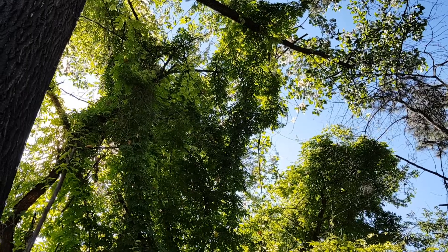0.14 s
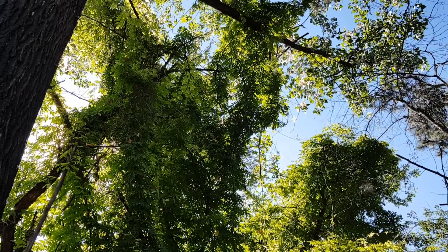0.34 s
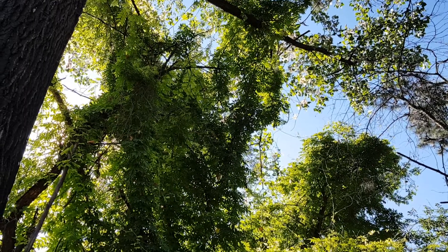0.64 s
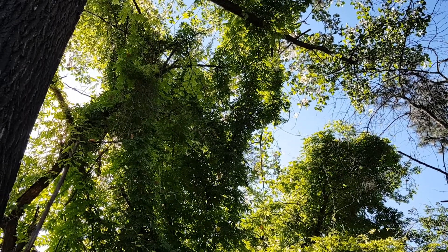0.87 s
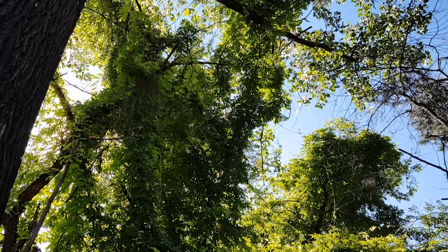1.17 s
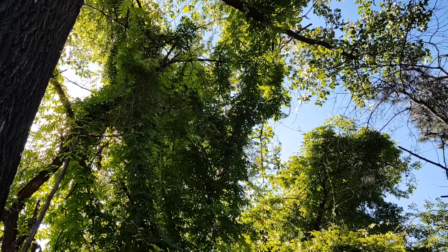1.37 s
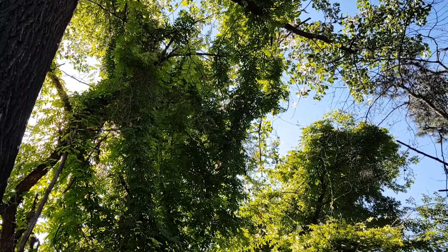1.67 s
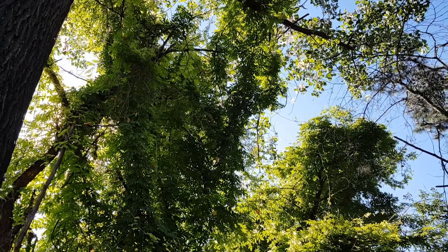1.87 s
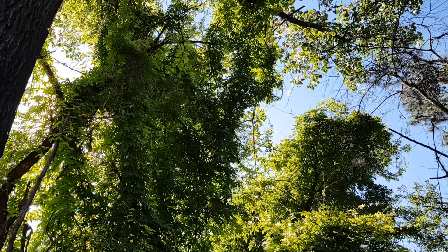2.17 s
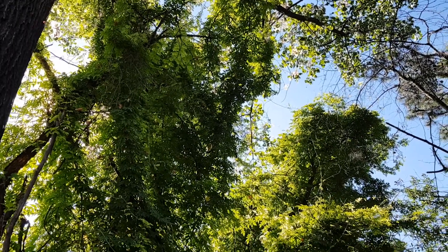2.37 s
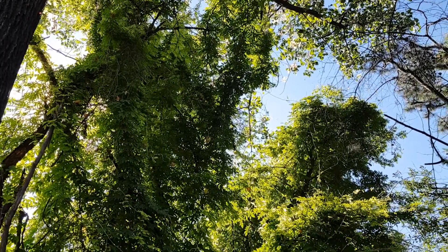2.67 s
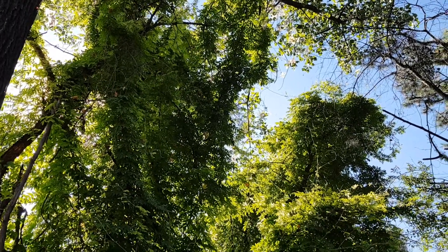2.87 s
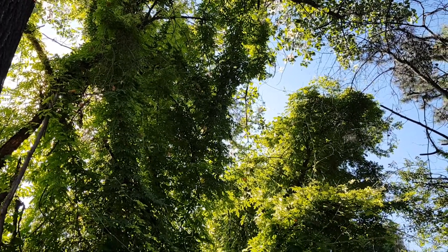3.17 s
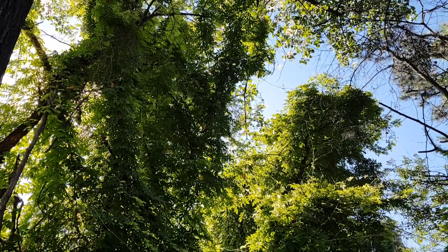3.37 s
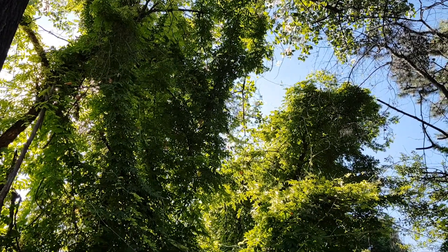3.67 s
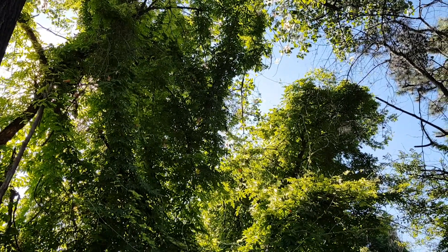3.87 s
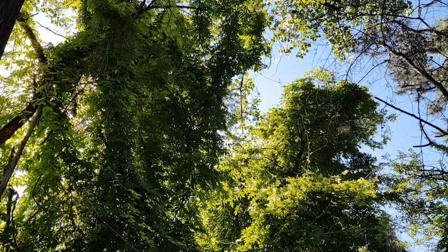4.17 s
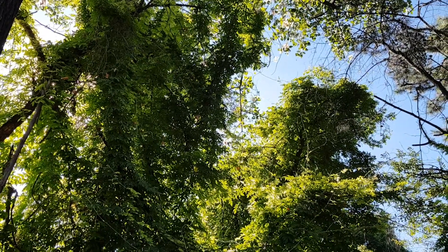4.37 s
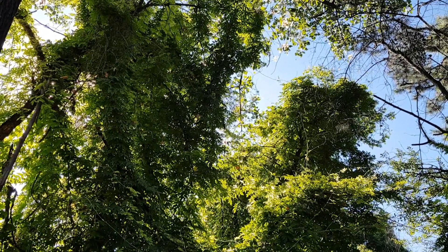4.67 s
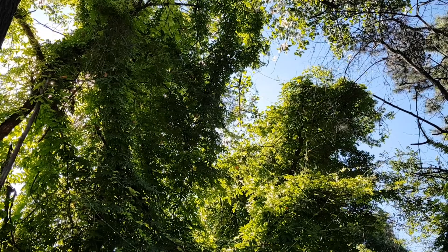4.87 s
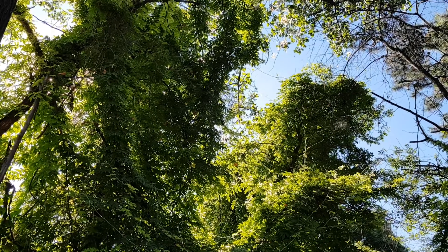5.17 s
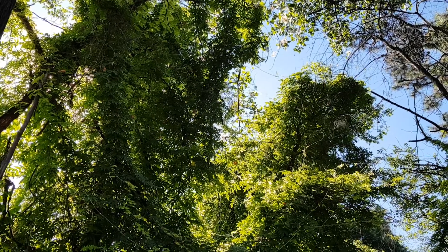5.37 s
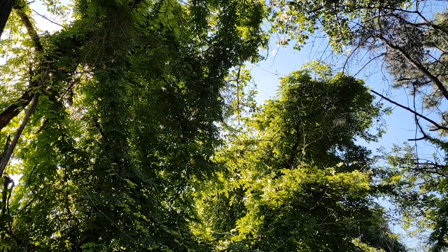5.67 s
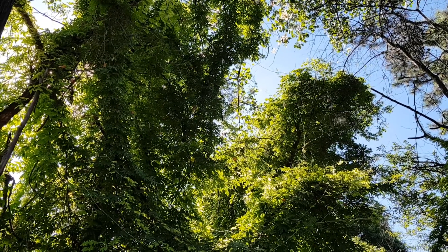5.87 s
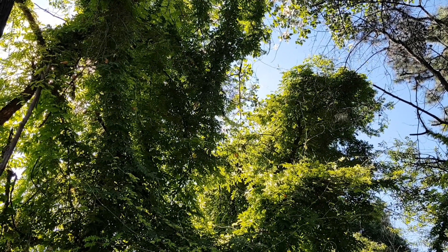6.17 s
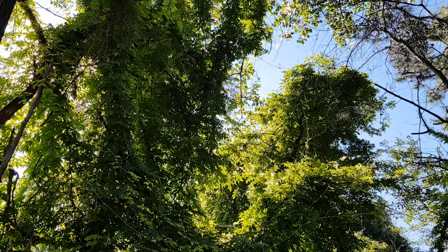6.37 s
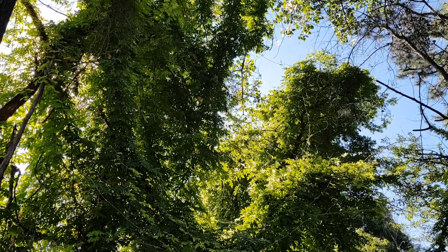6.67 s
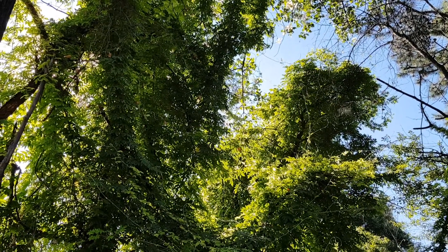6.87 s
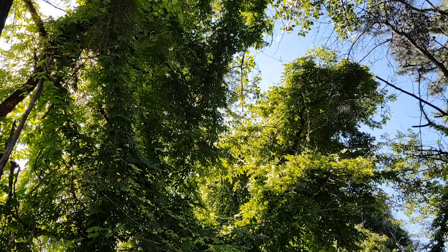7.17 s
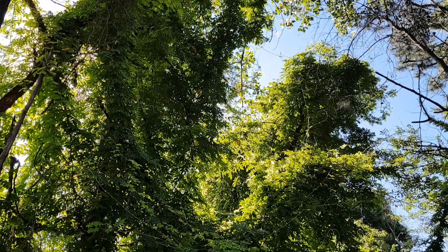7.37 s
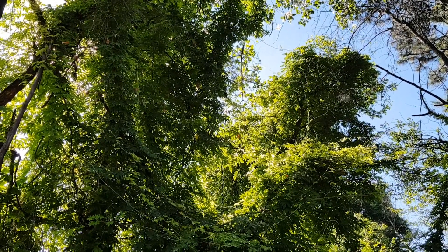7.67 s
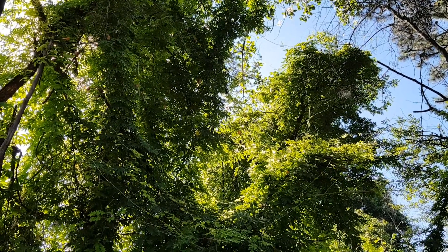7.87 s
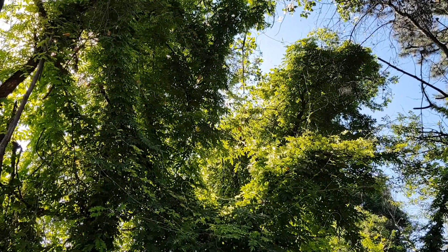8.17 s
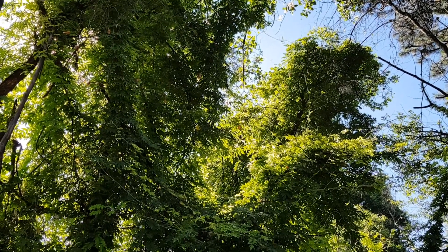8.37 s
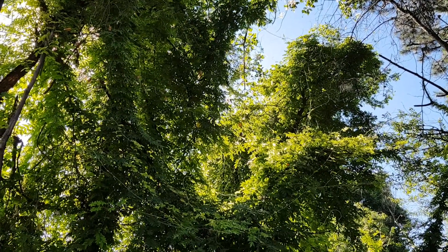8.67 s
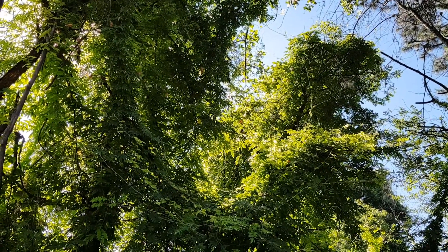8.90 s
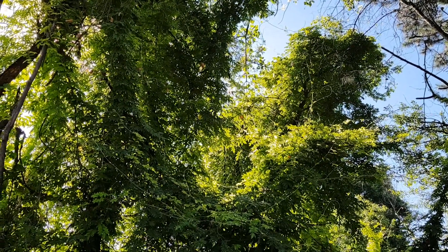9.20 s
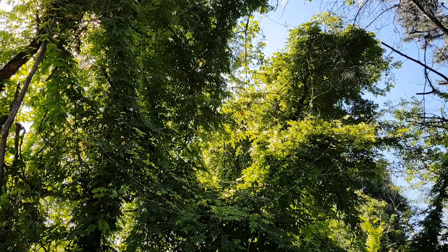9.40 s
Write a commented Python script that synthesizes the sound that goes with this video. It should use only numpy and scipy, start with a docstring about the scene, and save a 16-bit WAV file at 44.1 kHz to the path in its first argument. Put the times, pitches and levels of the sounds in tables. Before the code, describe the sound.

Sharp, rapidly pulsing cicada buzzes rise, slow and turn hoarse one after another in sunny trees, over a dense distant insect hiss.

```python
"""Shrill and droning cicada songs from summer trees: six near males sing in overlapping turns, most songs slowing and hoarse.
Each buckles two tymbals in turn, about 200 click pairs a second; the swinging abdomen picks the shrill or droning resonance.
A smaller kind, click trains over noise, whines above a far chorus of two noise bands.
Under it lie traffic rumble and tyre hiss (shaped noise), an engine note and a distant whine (sines),
machine hums (narrow noise), and wind on the two microphone ports (low, lumpy noise)."""
import sys
import numpy as np
from scipy import signal
from scipy.fft import rfft, irfft, next_fast_len
from scipy.io import wavfile
from scipy.ndimage import uniform_filter1d, map_coordinates

SR = 44100
rng = np.random.default_rng(int(sys.argv[2]) if len(sys.argv) > 2 else 0)


def file_out(sig):
    """Save sig as 16-bit WAV at sys.argv[1]."""
    # one column per channel
    cols = np.atleast_2d(sig).T
    # limit, then scale
    lim = np.clip(cols, -1, 1)
    pcm = np.round(lim * 32767).astype(np.int16)
    wavfile.write(sys.argv[1], SR, pcm)


def volts_from_decibels(level):
    """Turn decibel levels (scalar or array-like) into linear amplitude factors."""
    exponent = np.asarray(level, float) / 20
    return 10 ** exponent


N = 420713  # samples

# Wind. Steady breeze: (time [s], level [dB])
BREEZE = [(0, -59), (1.2, -56), (2, -58.5), (4.2, -63.5), (4.7, -57), (7.5, -57.5), (9.54, -66)]
# Puffs: (time of peak [s], peak level [dB], left over right [dB])
PUFFS = [(.88, -45, -12), (4.62, -52, -7), (5.66, -35, 13), (6.08, -52, 14), (6.539, -45, -17),
         (6.8, -46, -17), (7.15, -51, 14), (7.49, -60, 10)]
# Colour of the wind on the ports: (frequency [Hz], density [dB per Hz])
BUFFET_COLOUR = [(12, -46), (20, -5), (54, -1.5), (103, -1.5), (247, -26), (300, -29), (390, -56),
                 (660, -120)]

# Wavering hums of far machines: (centre [Hz], width [Hz], mean level [dB])
MOTORS = [(235, 16.4, -63.5), (397, 10, -73.5)]

# Distant traffic: (time [s], rumble level [dB], tyre hiss level [dB])
TRAFFIC_LEVELS = [(0, -51, -55), (2.9, -57, -59.5), (3.2, -54, -62), (9.54, -54, -71.5)]
# Colour of the rumble: (frequency [Hz], density [dB per Hz])
RUMBLE_COLOUR = [(18, -53), (30, -6), (82, 2), (222, -1), (300, -4), (377, -5), (956, -23), (1410, -19),
                 (1800, -66), (2000, -31), (2600, -35), (4400, -120)]
# How alike the rumble is at both ports: (frequency [Hz], left-right likeness [-1 to 1])
RUMBLE_ALIKE = [(60, 0.96), (130, 1), (290, 0.84), (640, 0.62), (1410, -1), (3100, -0.09), (6820, -0.05),
                (15000, -0.04)]
# Colour of the tyre hiss: (frequency [Hz], density [dB per Hz])
TYRE_COLOUR = [(240, -54), (400, -4), (572, 1), (1130, -2.5), (1360, -5), (2000, -13), (2600, -35),
               (4400, -120)]
# A low engine note: (time [s], pitch [Hz], level [dB])
ENGINE_NOTE = [(0.0, 78.9, -51), (0.876, 83.5, -53.5), (1.0, 90.9, -66)]
# A thin distant whine: (time [s], pitch [Hz], sine peak before flutter [dB])
WHINE = [(1.95, 1504, -59), (2.54, 1590, -57), (2.62, 1558, -50), (3.05, 1520, -57), (3.21, 1515, -57),
         (3.35, 1520, -54.5), (3.65, 1516, -48), (3.9, 1518, -54), (4, 1520, -49), (4.24, 1545, -57),
         (4.55, 1430, -62)]
# Two swells of its lower octave: (time of peak [s], sine peak before flutter [dB])
UNDERTONE = [(2.62, -54.5), (3.75, -63)]

# Far chorus, drone band: (time [s], level before wavering [dB])
FAR_LEVEL = [(0, -31), (1.41, -30.5), (2.44, -30), (3.56, -32), (4.36, -31.5), (4.97, -35), (5.77, -31.5),
             (6.1, -33), (6.99, -32.5), (8.72, -28.5), (9.14, -31), (9.54, -30.5)]
# Colour of that band: (frequency [Hz], density [dB per Hz])
FAR_COLOUR = [(1000, -54), (1700, -29), (3450, 0), (4590, 0.5), (5500, -7.5), (6580, -5), (7180, -9.5),
              (7500, -25.5), (9750, -24), (16500, -120)]
# How alike it is at both ports: (frequency [Hz], left-right likeness [-1 to 1])
FAR_ALIKE = [(2000, -0.04), (4000, -0.056)]

# Small males standing out: (mean click pair rate [Hz], level relative within the crowd [dB], left lead [us])
SMALL_SINGERS = [(248.6, -73, -400), (233.2, -54.5, 395), (234.5, -51.5, 301), (218.6, -43, 76)]
# Resonance of a small male's body: (frequency [Hz], density [dB per Hz])
SMALL_BODY = [(4120, -50), (7000, -31), (7370, -9.5), (7790, -4), (8570, -0.5), (9140, -3), (10500, -18),
              (13600, -9), (22000, -120)]
# The whole small crowd: (time [s], level [dB], left over right [dB])
SMALL_SWELL = [(0, -34, 2), (1.17, -35, 3), (1.64, -32, 4), (5.82, -32, 4.5), (7.49, -33.5, 5.5),
               (9.54, -32.5, 3.5)]

# Near males' resonance with the abdomen lifted: (frequency [Hz], density [dB per Hz])
SHRILL_BODY = [(4000, -120), (8000, -54), (10100, -29), (10900, -18), (11700, -6), (12500, 1), (13200, 2.5),
               (13800, 1), (14600, -0.5), (15800, -0.5), (18500, -7)]
# Their resonance with the abdomen lowered: (frequency [Hz], density [dB per Hz])
DRONE_BODY = [(1350, -53.5), (2500, -29), (3100, -29.5), (3750, -4.5), (4350, -1.5), (4650, -5.5),
              (5000, -4), (5600, -21.5), (6500, -10.5), (8000, -39), (10400, -54), (17600, -120)]
# Vigour of song, one list a near male: (time [s], shrill level with the abdomen lifted [dB])
EFFORT = [
    [(0, -18.5), (.9, -19.5), (1.2, -21.5), (1.66, -20.5), (1.98, -20.5), (2.05, -41), (2.16, -27),
     (2.36, -25), (3, -36)],
    [(1.58, -51), (1.64, -24), (1.9, -24.5), (2.16, -23), (2.4, -24.5), (3.84, -25.5), (4.14, -36),
     (4.26, -43)],
    [(4.16, -34), (4.34, -35), (4.64, -37.5), (4.9, -38), (5.06, -40), (5.14, -47)],
    [(5.06, -42), (5.16, -33), (5.86, -30), (6, -26), (6.4, -31), (7, -40)],
    [(5.5, -44), (5.6, -28.5), (5.72, -17), (5.96, -18), (6.14, -16.5), (7.3, -17), (8.18, -19.5),
     (8.58, -22.5), (8.88, -31)],
    [(8.82, -34), (9.08, -25), (9.2, -27.5), (9.3, -33), (9.54, -23)],
]
# Tymbal pace, one list a near male: (time [s], click pair rate with the abdomen lifted [Hz])
PACE = [
    [(0, 202.4), (.94, 202), (1.12, 201.4), (1.38, 201.1), (1.52, 200), (1.7, 199.9), (1.82, 196.2),
     (2.04, 197.5), (2.07, 194.3), (2.2, 188.3), (2.36, 184.6), (3, 179.1)],
    [(1.58, 209.5), (1.7, 211.3), (1.92, 212.6), (1.97, 213.8), (2.7, 208.5), (2.88, 204.7), (2.9, 201.7),
     (3.06, 197.2), (3.22, 194.5), (3.84, 180.2), (4.26, 178.1)],
    [(4.16, 185.4), (4.64, 186), (4.74, 182.4), (4.86, 185.7), (4.96, 186.7), (4.98, 188.7), (5.2, 188.8)],
    [(5.06, 206.3), (5.3, 207.2), (5.9, 202), (5.92, 199.3), (6.18, 196), (6.4, 194.4), (6.43, 192.4),
     (7, 188.4)],
    [(5.5, 210.3), (5.94, 210), (6.2, 206.5), (6.8, 203), (7.02, 201), (7.3, 197.3), (7.42, 192.8),
     (7.56, 189.8), (8.18, 178.3), (8.9, 176)],
    [(8.82, 195.4), (9.3, 200.1), (9.38, 201.3), (9.54, 201.3)],
]
# Abdomen drops and lifts, one list a near male: (down [s], up again [s], drone over the effort [dB])
SWINGS = [
    [(.15, .36, -2.5), (.53, .76, -1), (.92, 1.15, -2.5), (1.32, 1.6, -1.5), (1.69, 3.1, -1.5)],
    [(1.4, 1.97, -2)],
    [(4.687, 4.899, 6)],
    [(4.9, 5.328, 3.5)],
    [(5.3, 5.951, -5)],
    [(9.3, 9.7, -6.5)],
]
# One row a near male: (drone over the effort with the abdomen lifted [dB], pace where hoarseness sets in [Hz],
# pace where it is full [Hz], tuning of the hoarse shrill [ratio])
THROATS = [(-17.5, 193, 182.5, 0.86), (-7, 199, 180, .99), (0, 210, 177, 1), (-8.5, 230, 100, 0.99),
           (-19, 197.3, 160, 0.97), (-32, 203, 195, 0.97)]
# Where each near male sits and how he is built: (left lead [us], left phase lead [rad], left over right [dB],
# leaf echoes over direct [dB], second tymbal over first [dB], drone tuning [ratio])
PERCHES = [(-59, 3.58, 1.5, 0.5, -4.5, 0.998), (-43, 5.26, 0.5, 4, -2, 1.055), (-60, 2.4, -1, 8.5, 4, 0.97),
           (-63, 3.24, 1, 2, -3, 1.084), (-129, 0.87, 1, 4, -7, 1.102), (-110, 1.8, -1, -0.5, -1, 1.12)]


def unit(x):
    """Scaled to rms 1."""
    return x / np.sqrt(np.mean(x ** 2) + 1e-20)


def along(points, hz):
    """(frequency [Hz], value) points read on a log frequency axis."""
    f, v = np.transpose(points)
    return np.interp(np.log(hz + 1), np.log(f + 1), v)


def curves(rows, start=0, size=N):
    """One value per sample for each column after the time."""
    s, *cols = np.transpose(rows)
    t = (start + np.arange(size)) / SR
    return [np.interp(t, s, c) for c in cols]


def span(rows):
    """First sample, length and fade of a table; no fade in for a sound already under way at 0 s."""
    start = round(rows[0][0] * SR)
    size = min(round(rows[-1][0] * SR), N) - start
    k = np.arange(size)
    from_start = k + (start == 0) * SR
    return start, size, np.clip(np.minimum(from_start, size - k) / 800, 0, 1)


def wobble(rate, size=N):
    """A smooth random curve, rate knots a second."""
    knots = rng.standard_normal(int(size * rate / SR) + 4)
    return map_coordinates(knots, [np.arange(size) * rate / SR])


def peaked(s, rise, fall):
    """Level [dB] against the peak at time s, rising and falling at so many dB a second."""
    t = np.arange(N) / SR - s
    return np.where(t < 0, rise * t, -fall * t)


def filtered(x, response):
    """x times a complex response of frequency."""
    m = next_fast_len(x.shape[-1] + 8192)
    return irfft(rfft(x, m) * response(np.fft.rfftfreq(m, 1 / SR)), m)[..., :x.shape[-1]]


def sides(pan_db):
    """Left and right gains."""
    return volts_from_decibels(np.array([pan_db / 2, -pan_db / 2]))


def rush(spectrum, alike, patchy_db):
    """Coloured stereo noise of rms 1, with patches of random gain in time and frequency."""
    z = signal.stft(rng.standard_normal((2, N)), nperseg=512)[2]
    field = uniform_filter1d(rng.standard_normal(z.shape[1:]), 6, 0)
    field = unit(uniform_filter1d(field, 14, 1))
    pair = signal.istft(z * volts_from_decibels(patchy_db * field), nperseg=512)[1][:, :N]

    def mid_side_response(hz):
        angle = np.arccos(np.clip(along(alike, hz), -1, 1)) / 2
        return volts_from_decibels(along(spectrum, hz)) * [np.cos(angle), np.sin(angle)]

    mid, side = filtered(pair, mid_side_response)
    return unit(np.array([mid + side, mid - side]))


def wind():
    """A light breeze and a few puffs buffet the two ports, only partly alike."""
    level = volts_from_decibels(curves(BREEZE)[0]) * sides(2.5)[:, None]
    for s, db, pan_db in PUFFS:
        puff = volts_from_decibels(db + peaked(s, rise=300, fall=280))
        level = level + puff * sides(pan_db)[:, None]
    lumps = volts_from_decibels(1.7 * np.array([wobble(18), wobble(30)]))
    return level * unit(lumps * rush(BUFFET_COLOUR, [(60, 0.57)], patchy_db=2.0))


def motors():
    """Far machines hum as narrow, unsteady noise bands, alike at both ports."""
    out = 0
    for centre, width, db in MOTORS:
        noise = rng.standard_normal(N)
        band = unit(filtered(noise, lambda hz: np.exp(-.5 * ((hz - centre) / width) ** 2)))
        out = out + volts_from_decibels(db + 2.9 * wobble(1.5)) * band
    return out


def engine_note():
    """A sine glides along the pitch of a low engine."""
    start, size, fade = span(ENGINE_NOTE)
    hz, db = curves(ENGINE_NOTE, start, size)
    out = np.zeros(N)
    out[start:start + size] = np.sqrt(2) * fade * volts_from_decibels(db) * np.sin(2 * np.pi * np.cumsum(hz) / SR)
    return out


def distant_whine():
    """A fluttering sine with an unsteady phase; the octave below it swells twice."""
    start, size, fade = span(WHINE)
    hz, db = curves(WHINE, start, size)
    low = sum(volts_from_decibels(peak_db + peaked(s, rise=53, fall=53)) for s, peak_db in UNDERTONE)
    low = low[start:start + size]
    phase = 2 * np.pi * np.cumsum(hz) / SR + .5 * wobble(27.9, size=size)
    phase = phase + np.array([[1.1], [-1.1]])  # radians, left and right: it comes from the side
    flutter = fade * volts_from_decibels(4.5 * wobble(16, size=size))
    out = np.zeros((2, N))
    out[:, start:start + size] = flutter * (volts_from_decibels(db) * np.sin(phase) + low * np.sin(phase / 2))
    return out


def traffic():
    """Far rumble and tyre hiss as shaped noise, with the engine note and the whine."""
    rumble_db, hiss_db = curves(TRAFFIC_LEVELS)
    rumble = volts_from_decibels(rumble_db) * rush(RUMBLE_COLOUR, RUMBLE_ALIKE, patchy_db=0.5)
    hiss = volts_from_decibels(hiss_db) * rush(TYRE_COLOUR, [(500, 0.81), (1400, 0.17)], patchy_db=2.0)
    return rumble + hiss + engine_note() + distant_whine()


def far_chorus():
    """So many far males overlap that their clicks blur into two bands of noise."""
    level = volts_from_decibels(curves(FAR_LEVEL)[0] + 0.083 * wobble(11.0))
    drone = level * sides(1.65)[:, None] * rush(FAR_COLOUR, FAR_ALIKE, patchy_db=1.5)
    colour = [(hz, db + 3 * hz / 1000) for hz, db in SHRILL_BODY]  # tilted up 3 dB per kHz
    shrill = rush(colour, [(12000, 0)], patchy_db=1.5)
    return drone + volts_from_decibels(-45) * shrill


def tymbals(pair_hz, hoarse, second_db, slip_us, hurry):
    """Two tymbals click in turn; a hoarse male times his pairs loosely and hurries the second click."""
    turns = np.cumsum(pair_hz) / SR
    size = len(turns)
    first = np.interp(np.arange(1, turns[-1] - 1), turns, np.arange(size))
    rough = hoarse[first.astype(int)]
    period = SR / pair_hz[first.astype(int)]
    chance = rng.standard_normal((len(first), 4))
    slip = slip_us * 1e-6 * SR
    first = first + slip * (rough + .025) * chance[:, 0]
    gap = .489 + .0015 * wobble(300, size=len(first)) - hurry * rough ** .4  # of a period
    second = first + period * gap + slip * (.14 * rough + .02) * chance[:, 1]
    at = np.clip(np.r_[first, second], 9, size - 10)
    db = np.r_[0 * first, second_db + 0 * first]
    db = db + (.9 + np.r_[rough, rough]) * chance[:, 2:].T.ravel()
    # each click is a windowed sinc, so that it may fall between samples
    whole = at.astype(int)[:, None] + np.arange(-8, 9)
    off = whole - at[:, None]
    spike = np.sinc(off) * np.cos(np.pi * off / 18) ** 2
    return np.bincount(whole.ravel(), (spike * volts_from_decibels(db)[:, None]).ravel(), size)


def perched(x, lead_us, lead_rad, echo_db, t60, far_db):
    """The ports hear a delay; near leaves smear each click and far trunks add a tail, ever new at each port."""
    hop = 8192
    t = np.arange(4096) / SR
    hz = np.fft.rfftfreq(4 * hop, 1 / SR)
    direct = np.exp(.5j * np.outer([1, -1], lead_rad + 2 * np.pi * hz * lead_us * 1e-6))
    leaves, trunks = volts_from_decibels(-60 * t / .006), volts_from_decibels(far_db - 60 * t / t60)
    padded, out = np.pad(x, (2 * hop, 3 * hop)), np.zeros((2, len(x) + 8 * hop))
    for at in range(0, len(x) + 2 * hop, hop):
        tail = rng.standard_normal((2, len(t))) * (leaves + trunks)
        path = direct + volts_from_decibels(echo_db) * rfft(tail / np.linalg.norm(tail[0]), 4 * hop)
        # scattering moves sound in time, not its broad colour
        path /= np.sqrt(uniform_filter1d(abs(path) ** 2, size=220))
        piece = np.pad(np.hanning(2 * hop) ** .8 * padded[at + hop:at + 3 * hop], hop)
        out[:, at:at + 4 * hop] += irfft(rfft(piece) * path)
    return out[:, 2 * hop:2 * hop + len(x)]


def small_males():
    """A few nearly steady click trains ring a small body and stand out of a noise blur of their kind."""
    level_db, pan_db = curves(SMALL_SWELL)
    crowd = volts_from_decibels(-41) * rush(SMALL_BODY, [(8000, .05)], patchy_db=.6)
    for pair_hz, db, lead_us in SMALL_SINGERS:
        pace = pair_hz * (1 + .003 * wobble(1.5))
        clicks = tymbals(pace, np.full(N, .12), -2, slip_us=60, hurry=.01)
        voice = unit(filtered(clicks, lambda hz: volts_from_decibels(along(SMALL_BODY, hz))))
        voice = voice * volts_from_decibels(db + 1.5 * wobble(1.2))
        crowd += perched(voice, lead_us, 0, echo_db=7.5, t60=0.054, far_db=8)
    return volts_from_decibels(level_db) * sides(pan_db) * unit(crowd)


def song(effort, pace, swings, throat, start, size):
    """A dropped abdomen opens the drone, shuts the shrill and quickens the clicks; a slow pace makes hoarse."""
    lifted_db, clear_hz, hoarse_hz = throat[:3]
    t = (start + np.arange(size)) / SR
    effort_db, = curves(effort, start, size)
    pair_hz, = curves(pace, start, size)
    # seconds to the nearer end of each swing
    inside = np.array([np.maximum(np.minimum(t - down, up - t), 0) for down, up, db in swings])
    low = np.minimum(inside / .05, 1)  # the drone opens within .05 s
    shrill_db = effort_db
    for down, up, _ in swings:
        # the shrill shuts at 239 dB/s, opens again at 160 dB/s and loses 19 dB at most
        shut_db = np.clip(np.minimum(239 * (t - down), 160 * (up - t)), 0, 19)
        shrill_db = shrill_db - shut_db
    drone_db = effort_db + lifted_db + (np.array(swings)[:, 2] - lifted_db) @ low
    tight = np.minimum(inside.sum(0) / .09, 1)  # full drone pitch after .09 s
    pair_hz = pair_hz + 1.7 * low.sum(0)
    hoarse = np.clip((clear_hz - pair_hz) / (clear_hz - hoarse_hz), 0, 1)
    return shrill_db, drone_db, tight, pair_hz, hoarse


def rib_sweep(hz):
    """Ribs give way one after another: a phase response that makes each click sweep in pitch."""
    return np.exp(1j * np.pi * .19 * (hz / 1000 - 13.5) ** 2)  # .19 ms per kHz


def ring_shrill(clicks, ratio):
    """Swept clicks ring the resonance of the lifted abdomen, tuned by ratio."""
    return unit(filtered(clicks, lambda hz: volts_from_decibels(along(SHRILL_BODY, hz / ratio)) * rib_sweep(hz)))


def ring_drone(clicks, ratio):
    """Clicks ring the resonance of the lowered abdomen, tuned by ratio."""
    return unit(filtered(clicks, lambda hz: volts_from_decibels(along(DRONE_BODY, hz / ratio))))


def near_males():
    """The same clicks ring the shrill or the droning resonance as the abdomen swings."""
    out = np.zeros((2, N))
    for effort, pace, swings, throat, perch in zip(EFFORT, PACE, SWINGS, THROATS, PERCHES):
        lead_us, lead_rad, pan_db, echo_db, second_db, tuning = perch
        start, size, fade = span(effort)
        shrill_db, drone_db, tight, pair_hz, hoarse = song(effort, pace, swings, throat, start, size)
        clicks = tymbals(pair_hz, hoarse, second_db, slip_us=90, hurry=.22)
        clear, sagged = ring_shrill(clicks, 1), ring_shrill(clicks, throat[3])
        shrill = clear + np.sqrt(hoarse) * (sagged - clear)
        # near the ends of a swing the drone is tuned lower
        taut, slack = ring_drone(clicks, tuning), ring_drone(clicks, 0.897 * tuning)
        drone = slack + tight * (taut - slack)
        voice = fade * (volts_from_decibels(shrill_db) * shrill + volts_from_decibels(drone_db) * drone)
        heard = perched(voice, lead_us, lead_rad, echo_db, t60=0.079, far_db=-9)
        out[:, start:start + size] += sides(pan_db)[:, None] * heard
    return out


def scene():
    """All layers summed at the two ports, from the background to the nearest males."""
    return wind() + motors() + traffic() + far_chorus() + small_males() + near_males()


def band_limit(x):
    """A steep low-pass at the top of the band."""
    return signal.sosfilt(signal.butter(12, 16750, fs=SR, output="sos"), x)


def record(dry):
    """The finished mix keeps nothing from 15780 Hz up."""
    mix = filtered(dry, lambda hz: hz < 15780)
    return band_limit(mix)


dry = scene()
out = record(dry)
file_out(out)
```